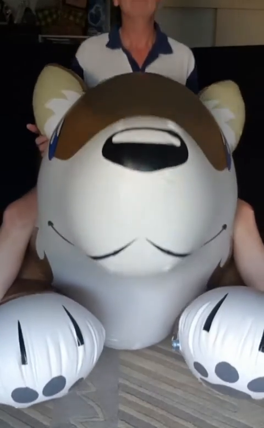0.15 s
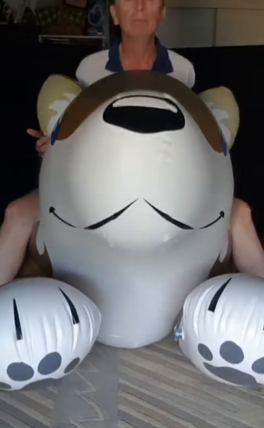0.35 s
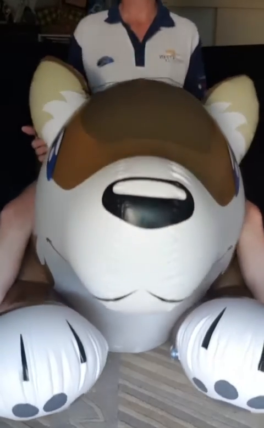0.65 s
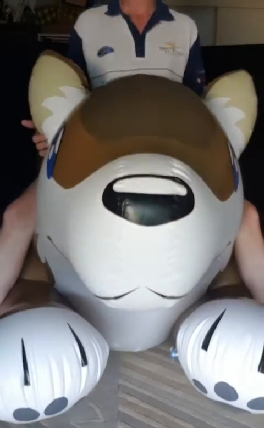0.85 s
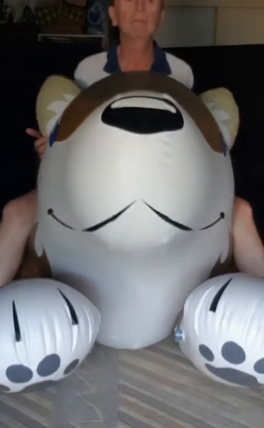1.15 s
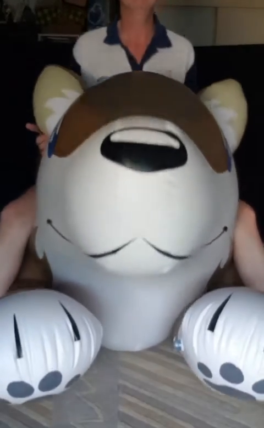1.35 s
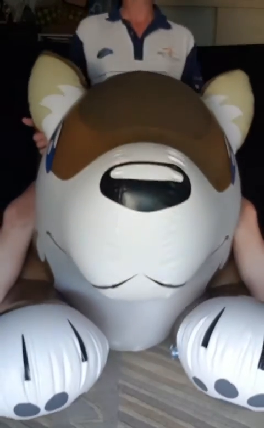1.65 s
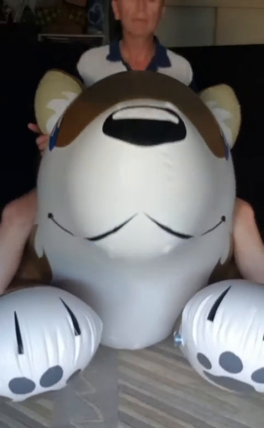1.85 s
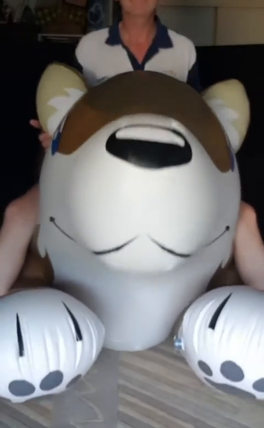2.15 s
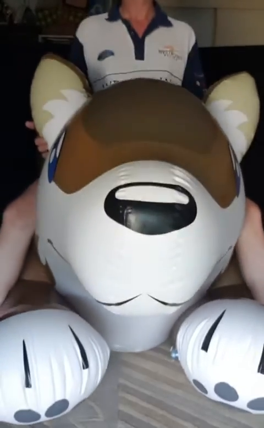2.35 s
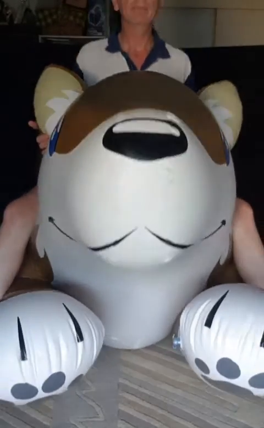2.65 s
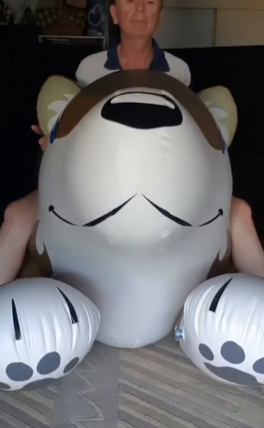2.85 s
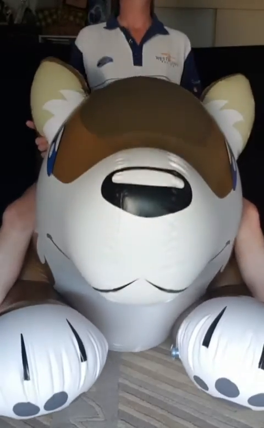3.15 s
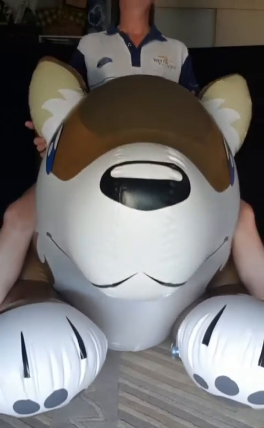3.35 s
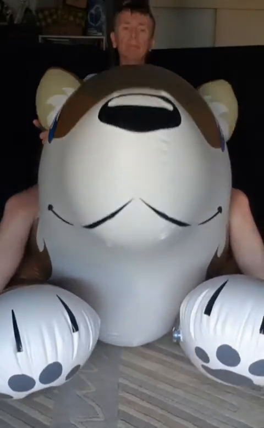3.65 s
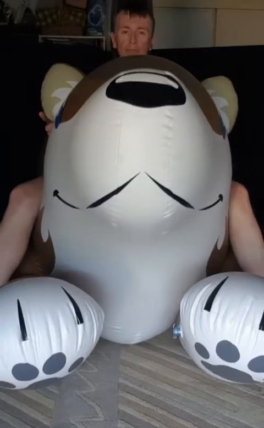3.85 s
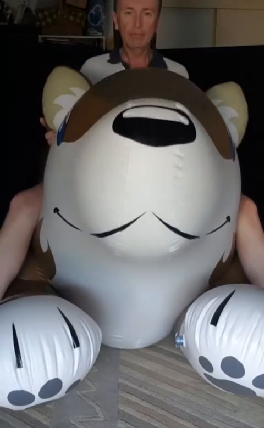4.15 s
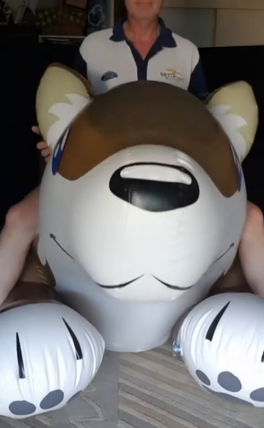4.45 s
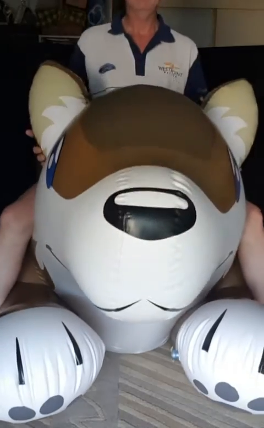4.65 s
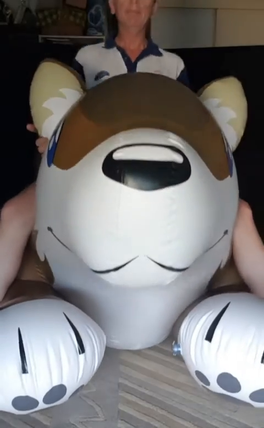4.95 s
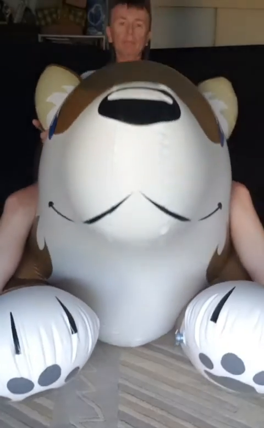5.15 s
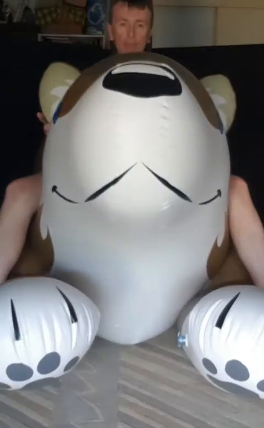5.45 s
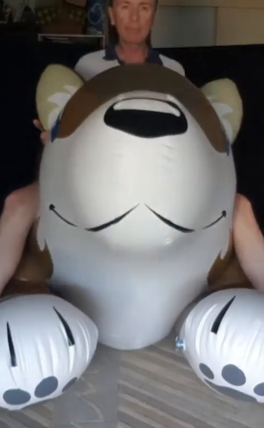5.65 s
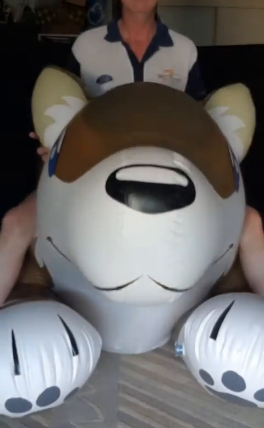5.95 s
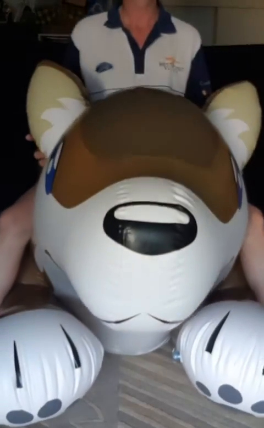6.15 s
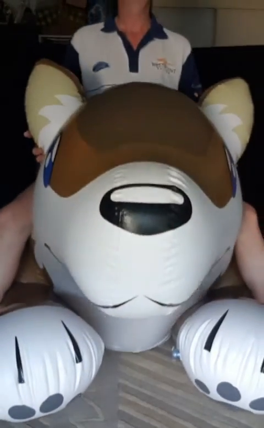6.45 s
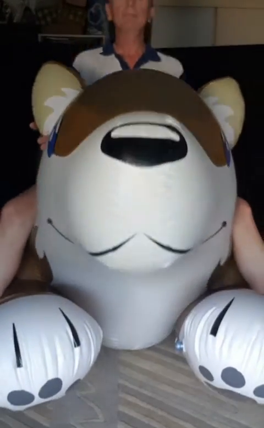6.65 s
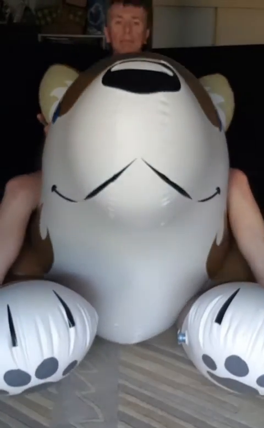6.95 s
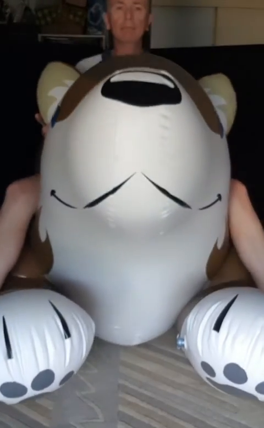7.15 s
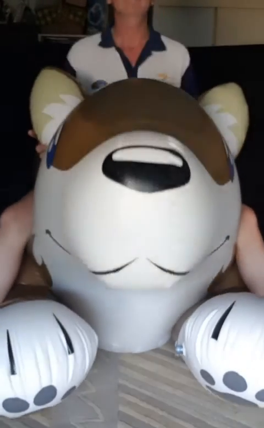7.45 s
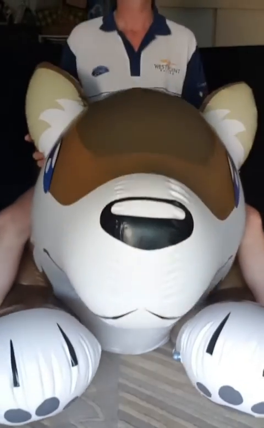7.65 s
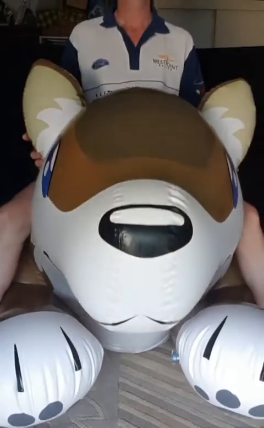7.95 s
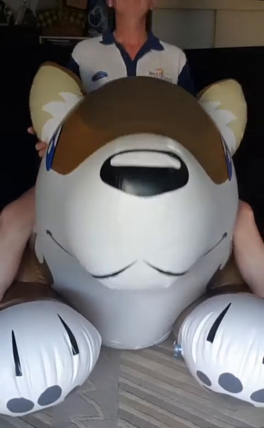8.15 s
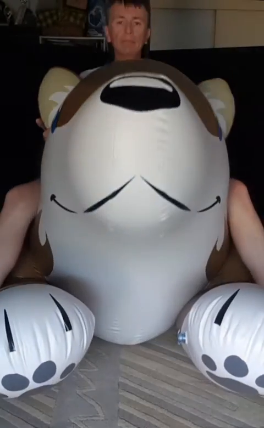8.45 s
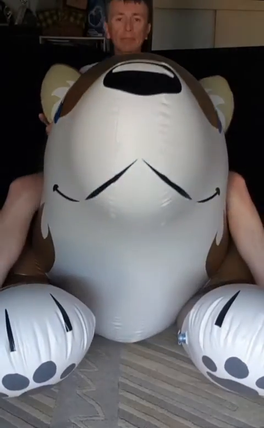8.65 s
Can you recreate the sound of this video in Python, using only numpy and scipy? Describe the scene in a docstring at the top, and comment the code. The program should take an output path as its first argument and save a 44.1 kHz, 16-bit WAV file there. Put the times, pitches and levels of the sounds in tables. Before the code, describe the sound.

In a small quiet room, a person rocks on a big inflatable vinyl animal. Each bounce brings a stuttering, drum-like rubbery rumble and a swell of dry rubbing hiss, with short low groans and hollow crease pops. Tiny squeaks appear now and then, and one fold snaps. The surges come several times within each bounce, uneven and sometimes almost silent between. Close phone microphone, lightly stereo.

```python
"""Rocking on an air-filled vinyl toy

A rider rocks on a large air-filled vinyl toy over the quiet of a small room, close to a phone.
Stick and slip: the vinyl lets go in quick uneven slips, each a damped swing of the skin and a kick to the air inside.
The sliding surfaces hiss as filtered noise that swells with the slips, with tiny chirps in it.
Creases pop as short knocks with a crack, regular slipping groans and squeaks as gliding tones, one fold snaps."""
import sys
import numpy as np
from scipy import signal
from scipy.fft import rfft, irfft, next_fast_len
from scipy.io import wavfile
from scipy.ndimage import uniform_filter1d, map_coordinates

SR = 44100
rng = np.random.default_rng(int(sys.argv[2]) if len(sys.argv) > 2 else 0)


def inscribe(sig):
    """Save sig as 16-bit PCM at rate SR to the path in sys.argv[1].

    A 1-D sig is mono; a 2-D sig holds one channel per row.
    Samples are clipped to [-1, 1] before scaling.
    """
    pcm = np.round(np.clip(np.atleast_2d(sig).T, -1, 1) * 32767)
    wavfile.write(sys.argv[1], SR, pcm.astype(np.int16))


N = 388080

# groans, when the slips fall into step:
# (start t/s, end t/s, start f/Hz, end f/Hz, mean level/dB, mean octave level/dB re fundamental)
GROAN_TABLE = [(0.355, 0.43, 358, 358, -23.5, -33), (1.246, 1.332, 83.2, 67.6, -31.5, -11),
               (1.478, 1.552, 163.8, 124.5, -29.5, -2), (1.905, 1.969, 309, 293, -26, -27),
               (2.042, 2.101, 277.4, 260, -20, -30), (2.296, 2.358, 156, 151, -27.5, -3.5),
               (3.691, 3.753, 132, 148.6, -22, 2), (3.781, 3.855, 87, 85, -25, -5),
               (4.209, 4.274, 253.2, 265, -26, -11), (4.327, 4.376, 261, 266.2, -25, -21),
               (4.375, 4.454, 188.5, 164.4, -22, -15), (4.568, 4.619, 178, 162.6, -31, -3.5),
               (4.932, 5.016, 121.6, 144, -27, -17), (5.274, 5.339, 89.6, 93, -25.5, -3),
               (5.407, 5.465, 78.1, 88.4, -22, -8), (5.682, 5.739, 158, 147.1, -26, -4.5),
               (5.935, 6.03, 187.8, 122.2, -20, -9), (7.293, 7.35, 162, 143, -28, -6),
               (7.516, 7.617, 143, 117, -24, -1.5), (8.351, 8.455, 259, 247.3, -28.5, -32)]


def amp(db):
    """Decibel law: level in dB to amplitude gain."""
    return 10 ** (np.asarray(db) / 20)


def unit(x):
    """Normalisation: x at rms 1."""
    return x / np.sqrt(np.mean(x ** 2) + 1e-20)


def along(points, hz):
    """Interpolation of (f/Hz, value) points on a logarithmic frequency axis."""
    f, v = np.transpose(points)
    return np.interp(np.log(hz + 1), np.log(f + 1), v)


def wobble(rate):
    """Slow random modulation: a smooth curve through random knots, rate of them a second."""
    knots = rng.standard_normal(int(N * rate / SR) + 4)
    return map_coordinates(knots, [np.arange(N) * rate / SR])


def filtered(x, response):
    """Linear filtering: the spectrum of x times a complex response of frequency."""
    m = next_fast_len(N + SR // 2)
    return irfft(rfft(x, m) * response(np.fft.rfftfreq(m, 1 / SR)), m)[..., :N]


def coloured(x, colour):
    """Spectral shaping of x by a table of (f/Hz, level/dB)."""
    return filtered(x, lambda hz: amp(along(colour, hz)))


def steady(x, span_s):
    """Envelope normalisation: x with its slow level evened out to about rms 1."""
    power = np.abs(uniform_filter1d(x ** 2, max(1, int(span_s * SR))))
    return x / np.sqrt(power + 1e-3 * np.mean(x ** 2))


def overlaid(start, sounds):
    """Superposition: each row of sounds added in from its start sample."""
    places = start[:, None] + np.arange(sounds.shape[1])
    return np.bincount(places.ravel(), sounds.ravel(), N + SR)[:N]


def thumps(start, hz, size, cycles, sag):
    """Damped oscillation: swings dying by 1/e in the given cycles; the pitch sags as the skin relaxes."""
    t = np.arange(SR // 40) / SR
    turns = hz[:, None] * t
    swing = np.sin(2 * np.pi * turns * (1 - sag * turns / (1 + turns)))
    envelope = np.exp(-turns / cycles) * (1 - np.exp(-4 * turns))
    return overlaid(start, size[:, None] * swing * envelope)


def bouts(rows, end_db):
    """Piecewise-linear envelopes: the level of successive bouts, then each pair of corner values joined up.

    A bout goes from its start level to a first corner, a second, then the next start."""
    start, db0, to_first, db1, from_second, db2, *pairs = np.transpose(rows)
    t, ends = np.arange(N) / SR, np.append(start[1:], N / SR)
    corners = np.append(np.ravel([start, start + to_first, ends - from_second], "F"), N / SR)
    corners = np.maximum.accumulate(corners)
    level = np.interp(t, corners, np.append(np.ravel([db0, db1, db2], "F"), end_db))
    held = np.delete(corners, np.s_[::3])  # the two corners of each bout, without its start
    joined = [np.interp(t, held, np.ravel(pair, "F")) for pair in zip(pairs[::2], pairs[1::2])]
    return [level] + joined


def room_tone():
    """Stationary background: noise with the room's spectrum at a fixed rms."""
    # quiet of the room: (f/Hz, relative level/dB)
    tone_colour = [(15, -41), (25, -6), (107, -5), (332, -5.5), (472, -32), (601, 2), (901, -27),
                   (1420, -23), (3110, -63), (6440, -25), (15700, -66)]
    return amp(-60) * unit(coloured(rng.standard_normal(N), tone_colour))


def slips(per_s, jitter):
    """Stick-slip timing: samples at which the vinyl lets go, and two random draws for each."""
    rate = per_s * np.exp(jitter * wobble(60))
    start = np.flatnonzero(np.diff(np.floor(np.cumsum(rate) / SR)))
    return start, rng.standard_normal((N // 100, 2))[:len(start)].T


def thumping_skin(tight, loose, skin_hz):
    """Membrane excitation: each slip of the two contact patches thumps the skin like a slack drum."""
    # spectrum of the skin: (f/Hz, relative level/dB before scaling by 0.46)
    skin_colour = [(53, -15), (90, -1.5), (113, -3.5), (157, -5), (214, -11), (259, 7), (296, 2), (333, 19),
                   (388, 1), (600, -12), (780, -64), (1320, -120)]
    start, (tune, size) = tight
    main = thumps(start, skin_hz[start] * np.exp(0.17 * tune), amp(1.8 * size), cycles=1.39, sag=0.15)
    start, (tune, size) = loose
    other = thumps(start, skin_hz[start] * np.exp(0.437 * tune), amp(2.8 * size), cycles=1.58, sag=0.12)
    loose_db = -3 + 4 * wobble(15)
    both = unit(main) + amp(loose_db) * unit(other)
    return steady(filtered(both, lambda hz: amp(0.46 * along(skin_colour, hz))), 0.098)


def air_cushion(kicks):
    """Cavity resonance: the enclosed air answers the kicks, and some noise, in its band-pass modes."""
    # modes of the air inside: (centre f/Hz, bandwidth/Hz, relative level/dB)
    modes = [(52.4, 16.6, -7), (89.6, 22.9, -1.5)]

    def response(f):
        total = 0
        for k, (centre, width, db) in enumerate(modes):
            resonance = 1j * f * width / (centre * centre - f * f + 1j * f * width)
            total = total + (-1) ** k * amp(db) * resonance  # signs alternate
        return total

    return steady(filtered(unit(kicks) + 0.46 * rng.standard_normal(N), response), 0.13)


def rubbing(colour, gate, burst):
    """Amplitude-modulated friction noise: coloured noise that swells with the bursts of slipping."""
    noise = rng.standard_normal(N) * (1 + gate * burst)
    return steady(coloured(noise, colour), 0.12)


def in_step():
    """Synchronisation, 0-1: how far the slips have locked into a groan."""
    out = np.zeros(N)
    for s0, s1, *_ in GROAN_TABLE:
        span = slice(int(s0 * SR), int(s1 * SR))
        out[span] = np.maximum(out[span], np.sqrt(np.hanning(span.stop - span.start)))
    return out


def chirps(hiss_db):
    """Lightly damped resonance: tiny chance squeaks blended into the sliding noise."""
    start, (tune, size) = slips(np.full(N, 120.), jitter=1.1)
    hz = np.clip(2400 * np.exp(0.6 * tune), 600, 12000)
    return thumps(start, hz, amp(hiss_db[start] - 9 + 2 * size), cycles=22, sag=0.021)


def patchy(x, depth_db):
    """Time-frequency modulation: random patches of gain, as the rubbed area keeps changing."""
    z = signal.stft(x, nperseg=256)[2]
    field = uniform_filter1d(rng.standard_normal(z.shape), 9, 0)
    field = uniform_filter1d(field, 10, 1)
    return signal.istft(z * amp(depth_db * unit(field)), nperseg=256)[1][:N]


def sliding_hiss(hiss_db, bright_db, fizz_db, burst):
    """Broadband friction: three bands of noise from the sliding surfaces, each with its own level."""
    # spectra of the three bands: (f/Hz, relative level/dB)
    hiss_colour, bright_colour, fizz_colour = [(590, -2), (1000, 0), (1400, -6), (4200, -15), (5460, -40),
                                               (9240, -120)], [(2240, -4), (3800, -3.5), (5620, -2.5),
                                                             (8500, -15.5), (11000, -56), (18700, -120)], [(4710, -32), (8000, -6),
                                                                             (9290, -0.5), (12800, 1.5),
                                                                             (14600, -1), (15700, -6.5)]
    grit = amp(0.36 * wobble(25))  # the surface is rougher in places
    hiss = amp(hiss_db) * grit * rubbing(hiss_colour, 0.2, burst)
    bright = amp(bright_db + 1.1 * wobble(30)) * rubbing(bright_colour, 0.12, burst)
    fizz = amp(fizz_db + 1.4 * wobble(18)) * rubbing(fizz_colour, 0.15, burst)
    return patchy(hiss + bright + fizz, depth_db=1.0)


def toy():
    """Stick and slip: each release thumps the skin, kicks the air cushion and swells the surface noise."""
    # bouts of gripping: (start t/s, slips level/dB, time to first corner t/s, level/dB,
    # time from second corner to next start t/s, level/dB at second corner, then at both corners:
    # skin f/Hz, f/Hz, extra air cushion level/dB, level/dB, extra edge level/dB, level/dB);
    # slip levels and skin pitch are means, varied by chance
    grips = [(0, -44, 0.055, -47.5, 0.14, -39, 193, 201, -1, -0.5, 1, -1.5),
             (0.22, -37.5, 0.19, -21, 0.059, -39.5, 240, 244, -0.5, 5, 5, -3),
             (0.53, -43, 0.12, -29.5, 0.1, -29.5, 202, 250, -9, -4, 2, -5.5),
             (0.86, -49, 0.066, -41.5, 0.042, -41, 236, 231, 6.5, 9.5, 1, 4),
             (1.0, -44.5, 0.094, -38, 0.17, -22, 200, 228, -8, -1, -0.5, 2),
             (1.36, -48, 0.095, -31, 0.095, -28, 232, 229, -2, -3, -2.5, 1),
             (1.64, -47, 0.05, -37, 0.029, -42, 209, 204, 1, -2, 5, 3.5),
             (1.75, -55, 0.041, -41, 0.048, -30.5, 233, 277, 1, 0, -1, 1.5),
             (1.96, -31, 0.06, -18.5, 0.11, -23.5, 245, 274, 3.5, 4.5, 0, -1.5),
             (2.19, -45.5, 0.047, -29.5, 0.02, -37, 225, 232, -6, -2, 0, 2.5),
             (2.285, -38, 0.04, -29.5, 0.12, -31.5, 185, 245, -11, -4, -3.5, -3),
             (2.5, -59, 0.041, -38, 0.021, -46, 231, 223, -5, -3, 3, 2),
             (2.62, -42.5, 0.25, -25, 0.082, -35, 235, 247, 3.5, -1, 1, -6),
             (3.0, -48.5, 0.098, -33.5, 0.18, -31, 237, 220, -7, -4, 0.5, -1),
             (3.37, -59, 0.092, -39, 0.024, -34, 230, 200, -2, -2, 2, 0),
             (3.6, -36, 0.028, -26, 0.027, -28, 245, 240, 5, 7, 4, -0.5),
             (3.675, -36, 0.024, -22.5, 0.034, -23, 228, 220, -3, 4, 1, 5),
             (3.78, -27, 0.022, -23, 0.13, -23.5, 211, 213, 5, -1, 2, -1),
             (4.05, -46, 0.12, -29, 0.094, -26, 244, 263, -5.5, -3, 3, 0.5),
             (4.33, -31, 0.083, -28, 0.036, -29.5, 175, 200, -5, -5, 1, -1),
             (4.52, -29, 0.034, -25.5, 0.098, -40.5, 223, 170, -2, -3, 1.5, -3),
             (4.8, -56, 0.055, -38.5, 0.11, -25, 270, 162, 3, 0, 7, 1),
             (5.1, -35.5, 0.16, -27.5, 0.023, -32, 237, 236, -7, 6, -3.5, -2),
             (5.28, -29.5, 0.085, -21, 0.15, -21, 192, 220, 1.5, 3.5, 1, -3),
             (5.59, -46, 0.11, -28.5, 0.03, -28, 190, 262, -4, -3, 3, 0.5),
             (5.79, -29, 0.07, -27, 0.03, -25, 248, 176, 2.5, 1, 2, -0.5),
             (5.96, -22, 0.04, -24.5, 0.15, -35, 191, 186, -6, 1, 0, -1),
             (6.27, -42.5, 0.16, -41.5, 0.18, -45, 210, 210, 5, 3, 0.5, 6.5),
             (6.62, -33.5, 0.025, -38.5, 0.096, -29, 242, 210, 3, 2, 2.5, -4.5),
             (6.95, -29, 0.1, -23.5, 0.044, -35, 223, 218, 5, 6.5, -2, 1),
             (7.15, -43, 0.075, -35.5, 0.021, -48, 234, 229, -6, -4, 0, 0),
             (7.27, -42, 0.066, -27.5, 0.03, -26.5, 180, 190, -10, -5, -0.5, 2),
             (7.5, -29, 0.075, -24.5, 0.05, -28.5, 191, 180, -10, 0, -2.5, -1.5),
             (7.72, -35, 0.12, -36.5, 0.026, -35, 231, 250, 2, 1, 3, 3.5),
             (7.88, -33, 0.026, -41, 0.03, -40, 240, 220, 2, 2, 3, 3),
             (8.0, -42.5, 0.13, -36.5, 0.049, -29, 199, 263, 1, 5, 2.5, -3),
             (8.55, -32.5, 0.13, -25.5, 0.025, -37, 235, 224, -1, -1, -3, -4),
             (8.73, -41, 0.03, -33, 0.022, -38, 253, 237, -4.5, -4, 0.5, -6)]
    # bouts of sliding: (start t/s, mean hiss level/dB, time to first corner t/s, level/dB,
    # time from second corner to next start t/s, level/dB at second corner, then at both corners:
    # extra brightness level/dB, level/dB, extra fizz level/dB, level/dB)
    slides = [(0, -57, 0.1, -56.5, 0.067, -44.5, -2.5, 0.5, 0, -6),
              (0.33, -44.5, 0.056, -40.5, 0.03, -45.5, 3, -3.5, 2, -6),
              (0.47, -52, 0.139, -49, 0.15, -50.5, 3.5, 2, 1, 4),
              (0.88, -59, 0.018, -62, 0.06, -52.5, -4, -7, -4, -1),
              (0.98, -57.5, 0.212, -37, 0.096, -44, -0.5, 1, -2.5, 2),
              (1.36, -61.5, 0.059, -46.5, 0.036, -49.5, -1, 1.5, -2, 2),
              (1.64, -60, 0.011, -59, 0.054, -51.5, 2, 0.5, -1, 1),
              (1.76, -63, 0.093, -46.5, 0.16, -40, -1, 0.5, -5, 0),
              (2.16, -57.5, 0.092, -48.5, 0.15, -48, -1.5, 3, -1, 4.5),
              (2.5, -61.5, 0.36, -43, 0.053, -47, 0.5, -3, -5, -4),
              (3.0, -58, 0.085, -47.5, 0.14, -51, -1.5, 1, -5, 0),
              (3.37, -69.5, 0.11, -52.5, 0.02, -48, -2, -1, 1, -2),
              (3.605, -48, 0.02, -39.5, 0.02, -43, -6, -2, -4, 0),
              (3.665, -44, 0.09, -47, 0.2, -47, 8.5, 3, 6, 3),
              (4.08, -66, 0.029, -49.5, 0.067, -43.5, -0.5, -2, -11, -1),
              (4.31, -46, 0.2, -50, 0.16, -50, 1.5, -5.5, 3, -7),
              (4.81, -69, 0.035, -57.5, 0.12, -47, 2, -2.5, 4, 2),
              (5.1, -47.5, 0.058, -44, 0.053, -42.5, -0.5, 4.5, 0, 4),
              (5.42, -49, 0.088, -54, 0.063, -53.5, 1.5, 2.5, -3, 1),
              (5.59, -55, 0.04, -50, 0.044, -44.5, -0.5, 1, -4, 4),
              (5.82, -46, 0.07, -49, 0.11, -48, 1, -2, 1, 0.5),
              (6.13, -55.5, 0.066, -56, 0.27, -56, -1, -2, -4, 1),
              (6.46, -57, 0.083, -51.5, 0.03, -50.5, -1, 0, 5.5, 1),
              (6.64, -51, 0.13, -42.5, 0.1, -50, 1, 3, 2.5, 2),
              (7.14, -60, 0.054, -59, 0.049, -51.5, 2, -2, -2, 0),
              (7.27, -53, 0.031, -49.5, 0.077, -44.5, 1, -2.5, 2.5, -2),
              (7.47, -48.5, 0.018, -47.5, 0.197, -46.5, 1, -1.5, 0, -3),
              (7.82, -52.5, 0.062, -52, 0.13, -56, 6.5, 5, 2, 5),
              (8.0, -56.5, 0.2, -47, 0.1, -44.5, 2.5, -2, 3, -2),
              (8.47, -43.5, 0.21, -48, 0.041, -50, 7, -1, 4, -5),
              (8.72, -56.5, 0.01, -59, 0.036, -51, 0, 0, -2, 0)]
    # spectrum of the slips' noisy edge: (f/Hz, relative level/dB)
    edge_colour = [(240, -11.5), (400, -1), (483, -2.5), (533, -1), (707, -9), (768, -6.5), (835, -15.5),
                   (948, -17), (1240, -28.5), (1500, -25), (1950, -33.5), (3300, -120)]

    slip_db, skin_hz, cushion_db, edge_db = bouts(grips, end_db=-43)
    hiss_db, bright_db, fizz_db = bouts(slides, end_db=-55)
    # each level follows slips or hiss by a slope in dB per dB; the edge follows both
    cushion_db = cushion_db - 22 + 0.55 * slip_db
    fizz_db = fizz_db - 33 + 0.7 * hiss_db
    bright_db = bright_db - 18.5 + 0.8 * hiss_db
    shuffle_db, lurch_db = 1.28, 1.5  # chance unevenness of the slipping and hissing
    edge_db = edge_db - 2.5 + 0.31 * slip_db + 0.57 * hiss_db + shuffle_db * wobble(18)
    slip_db = slip_db + lurch_db * wobble(18)
    hiss_db = hiss_db + shuffle_db * wobble(18)
    skin_hz = skin_hz * np.exp(0.079 * wobble(15))

    per_s = 83 * np.exp(0.08 * wobble(3))  # slips a second
    tight = slips(per_s, jitter=0.12)
    loose = slips(1.6 * per_s, jitter=0.7)  # a second, looser contact patch
    start, (_, size) = tight
    loose_start, (loose_tune, loose_size) = loose
    kicks = np.bincount(start, amp(1.1 * size), N)
    kicks = kicks + np.bincount(loose_start, 1.63 * amp(0.56 * loose_size) * np.sign(loose_tune), N)
    decay = np.exp(-np.arange(SR // 50) / (0.0058 * SR))  # 5.8 ms to 1/e
    burst = unit(signal.fftconvolve(np.abs(kicks), decay)[:N])

    skin = amp(slip_db - 5.8 * in_step()) * thumping_skin(tight, loose, skin_hz)  # softer under a groan
    cushion = amp(cushion_db) * air_cushion(kicks)
    edge = amp(edge_db) * rubbing(edge_colour, 0.56, burst)
    sliding = chirps(hiss_db) + sliding_hiss(hiss_db, bright_db, fizz_db, burst)
    return skin + cushion + edge + sliding


def pops():
    """Snap-through buckling: a crease gives way with a short two-toned knock and a crack of noise."""
    # creases popping: (t/s, level/dB before offsets, crack level/dB re that and before offsets, initial f/Hz)
    pop_table = [(0.188, -30.5, -21, 660), (0.338, -26, -16, 490), (1.015, -33, -25, 530),
                 (1.537, -26, -19, 507), (1.56, -29, -16, 541), (1.662, -31, -28, 533),
                 (1.678, -29.5, -25, 583), (1.789, -34.5, -24, 747), (1.991, -32, -15, 595.4),
                 (2.226, -32, -20, 540), (2.524, -35, -21, 607), (2.886, -35, -22, 454),
                 (3.431, -38, -15, 582), (3.618, -25, -25, 452.4), (3.691, -30.5, -7, 452),
                 (3.86, -23, -19, 576), (3.919, -22.5, -30, 477), (4.099, -42, -20, 492),
                 (4.208, -25, -23, 470), (4.839, -25.5, -28, 524), (5.006, -26, -22, 547),
                 (5.802, -20, -26, 526), (5.827, -21, -22, 530), (5.859, -21.5, -23, 506),
                 (6.025, -27.5, -25, 525), (6.336, -31, -26, 455), (6.399, -33.5, -16, 450),
                 (6.981, -37, -14, 466), (7.212, -29, -18, 510), (7.617, -21, -31, 543),
                 (7.748, -33, -17, 485.4), (7.764, -31, -9, 540), (7.852, -28, -17, 669),
                 (7.879, -27, -13, 542.4), (8.016, -44, -13, 488.6), (8.118, -32.5, -8, 620),
                 (8.555, -26, -23, 530), (8.75, -37.5, -21, 490)]
    # spectrum of the crack: (f/Hz, gain/dB)
    crack_colour = [(300, 5), (900, 6), (2500, -10), (7000, -16), (15000, -30)]
    s, db, crack_db, hz = np.transpose(pop_table)
    start = (s * SR).astype(int)
    knocks = thumps(start, hz, amp(db + 3.5), cycles=2.4, sag=0.09)
    knocks = knocks + thumps(start, 0.566 * hz, amp(db + 2.0), cycles=0.92, sag=0.12)
    t = np.arange(SR // 40) / SR
    decay = amp(-60 * t / 0.0062) + 0.56 * amp(-60 * t / 0.2)  # 60 dB in 6.2 ms and at a rate of 60 dB in 0.2 s
    noise = rng.standard_normal((len(s), len(t)))
    cracks = amp(db + crack_db + 9.0)[:, None] * decay * noise
    cracks[:, 0] += amp(db + crack_db + 12.0)  # the snap itself
    return knocks + coloured(overlaid(start, cracks), crack_colour)


def glides(table, waver, rate):
    """Periodic stick-slip: a gliding tone with its octave, unsteady in pitch and strength."""
    out = np.zeros(N)
    unsteady, flutter, breathy = wobble(rate), wobble(rate), wobble(1.4 * rate)
    for s0, s1, hz0, hz1, db, octave_db in table:
        span = slice(int(s0 * SR), int(s1 * SR))
        n = span.stop - span.start
        hz = np.linspace(hz0, hz1, n) * (1 + waver * unsteady[span])
        phase = 2 * np.pi * (rng.random() + np.cumsum(hz) / SR)
        swell = np.hanning(n) ** 0.39 * amp(db + 1.6 * flutter[span])
        octave = amp(octave_db + 3.8 * breathy[span]) * np.cos(2 * phase + 1.28 * breathy[span])
        out[span] += swell * (np.sin(phase) + octave)
    return out


def groans():
    """Synchronised slipping: low gliding tones of the vinyl."""
    return glides(GROAN_TABLE, waver=0.019, rate=40)


def squeaks():
    """Rapid regular slipping: short high gliding tones of the vinyl."""
    # squeaks: (start t/s, end t/s, start f/Hz, end f/Hz, mean level/dB, mean octave level/dB re fundamental)
    squeak_table = [(.395, .418, 2600, 2500, -47, -20), (0.481, 0.52, 3596, 3500, -53, -20),
                    (.526, .554, 2540, 2570, -49, -22), (.598, .615, 2600, 2550, -51, -20),
                    (2.314, 2.364, 2155, 3020, -47, -6), (2.35, 2.385, 5130, 5350, -54, -28),
                    (2.354, 2.41, 3900, 3888, -53, -10), (2.36, 2.385, 2700, 2660, -55, -20),
                    (2.395, 2.422, 2670, 2760, -53, -4), (2.435, 2.465, 2750, 2793, -62, -20),
                    (3.543, 3.564, 2697, 2400, -47, -20), (5.72, 5.742, 5055, 5000, -54, -30),
                    (7.208, 7.228, 1960, 1908, -50, -16), (7.603, 7.618, 2500, 2500, -51, -20),
                    (7.665, 7.685, 4000, 3768, -52, -20), (7.74, 7.76, 2709, 2280, -51, -22)]
    return glides(squeak_table, waver=0.011, rate=220)


def snap():
    """Impulse response: a fold lets go at once, a single click filtered dull."""
    # the sharp snap of a fold: (t/s, level/dB before scaling and filtering)
    snap_point = (3.619, -23)
    out = np.zeros(N)
    out[int(snap_point[0] * SR)] = amp(snap_point[1]) * SR / 5000

    def response(hz):
        highpass = 1j * hz / (500 + 1j * hz)
        lowpass = 1 / (1 + 1j * hz / 1500)
        return highpass * lowpass / (1 + (hz / 5000) ** 6)

    return filtered(out, response)


def stereo(x):
    """Interchannel coherence: bass reaches both ports alike; treble, from ever new spots, differs."""
    # (f/Hz, left-right correlation, floored at -0.5)
    alike = [(60, 1), (130, 0.95), (290, 0.94), (640, 0.67), (1410, -0.083), (3100, 0.15), (6820, -0.053),
             (15000, 0.08)]
    # (f/Hz, left minus right level/dB)
    lean = [(60, 0.0), (110, 0.5), (200, 1.5), (380, 1.0), (700, 1.0), (1290, 2.5), (2380, 3.0),
            (4400, 3.5), (8120, -0.5), (15000, -3.5)]
    z = signal.stft(x, nperseg=512)[2]
    scrambled = z * np.exp(2j * np.pi * rng.random(z.shape))
    other = signal.istft(scrambled, nperseg=512)[1][:N]
    other = other * amp(3.0)  # scrambled frames add up a little weaker
    # x plus and minus tan(arccos(c) / 2) of an unrelated equal signal correlate by c
    side = filtered(other, lambda hz: np.tan(np.arccos(np.clip(along(alike, hz), -0.5, 1)) / 2))
    sign = np.array([[1], [-1]])
    return filtered(x + sign * side, lambda hz: amp(sign * along(lean, hz) / 2))


def scene():
    """Superposition: the toy over the quiet of the room, spread to two channels."""
    return stereo(room_tone() + toy() + pops() + groans() + squeaks() + snap())


def record(dry):
    """Band limiting: the phone keeps nothing from 15.8 kHz up."""
    return filtered(dry, lambda hz: hz < 15800)


dry = scene()
out = record(dry)
inscribe(out)
```